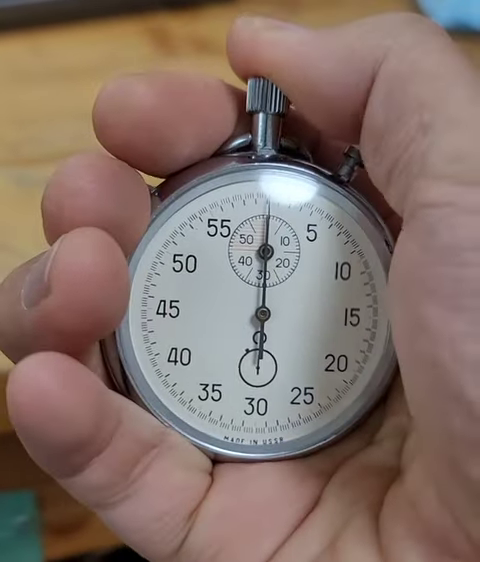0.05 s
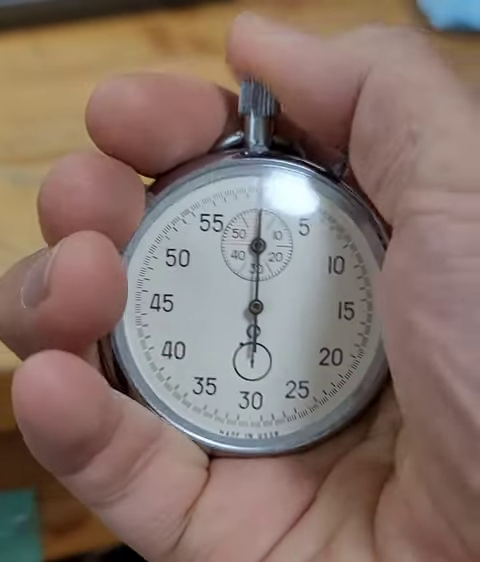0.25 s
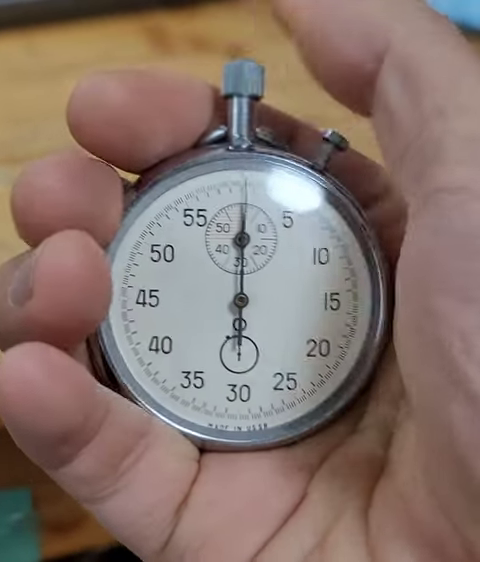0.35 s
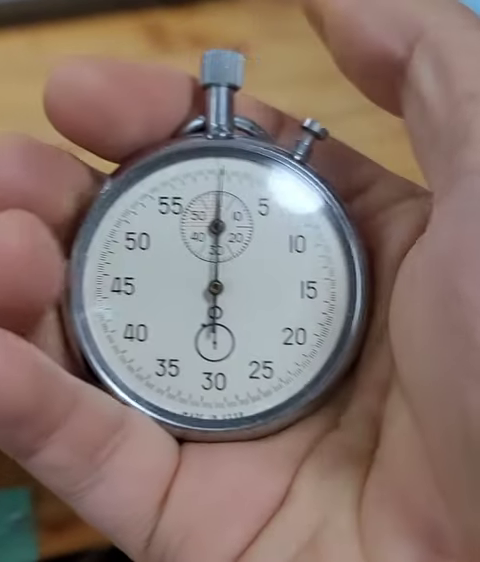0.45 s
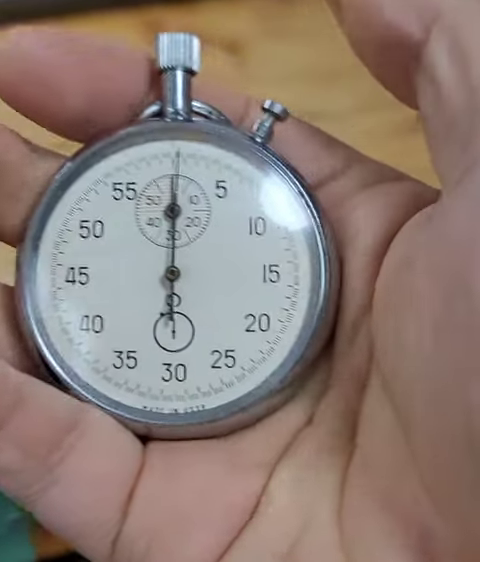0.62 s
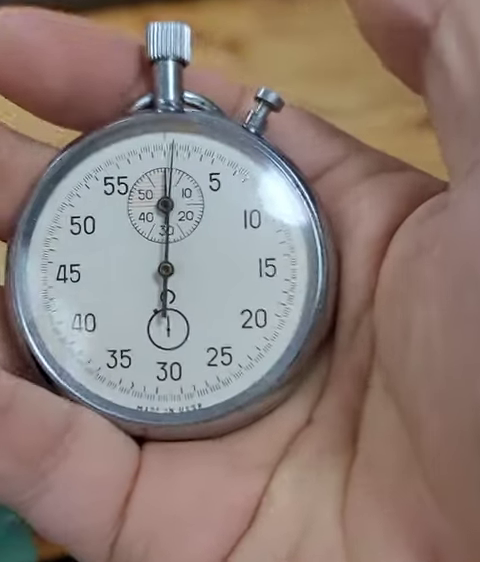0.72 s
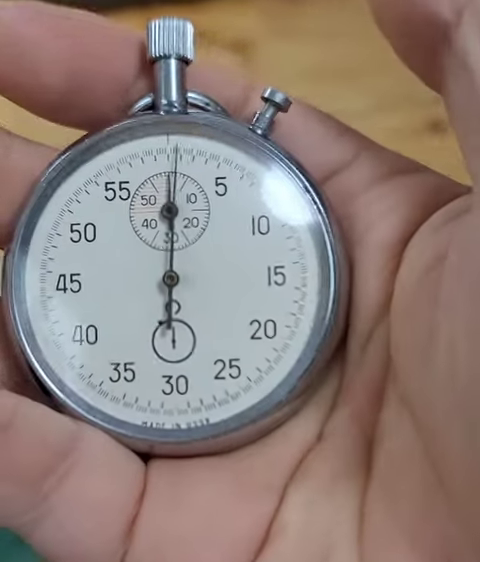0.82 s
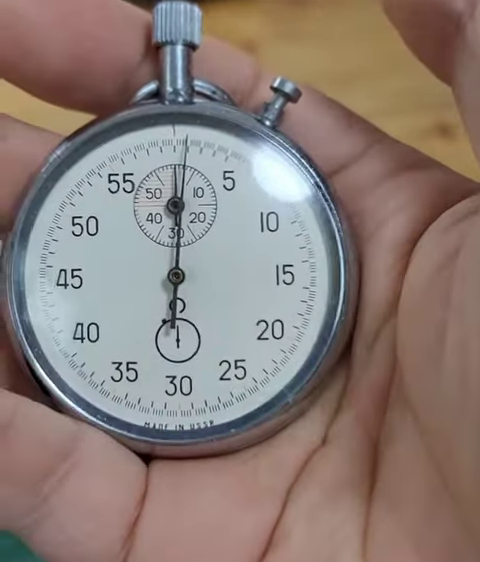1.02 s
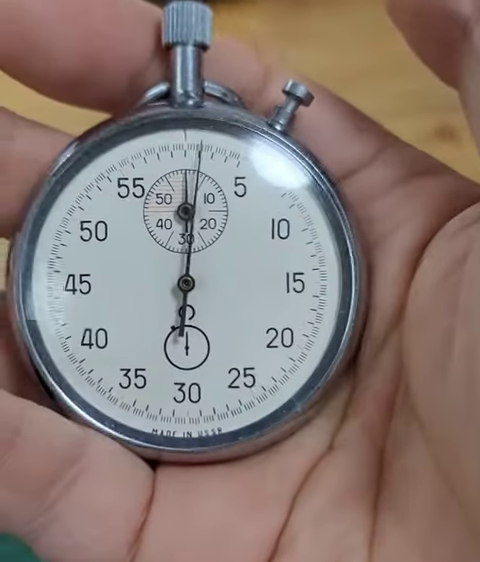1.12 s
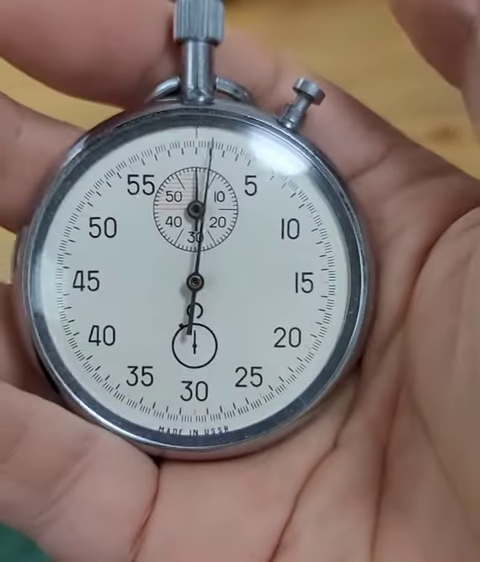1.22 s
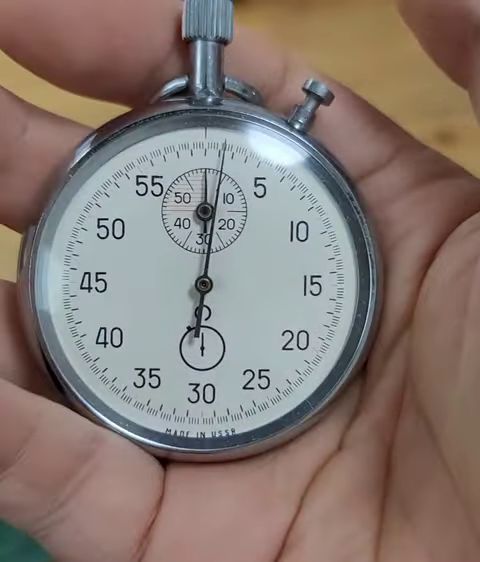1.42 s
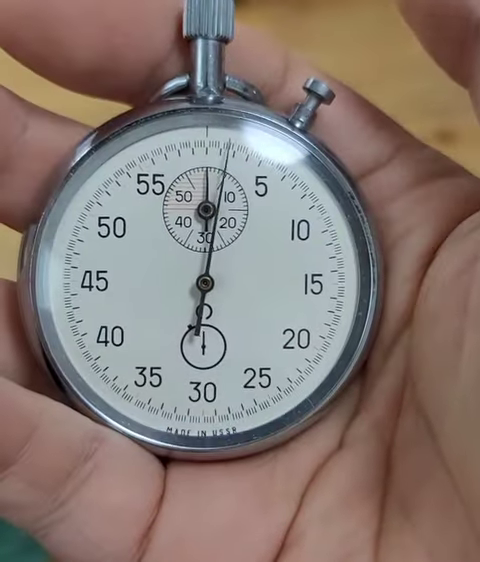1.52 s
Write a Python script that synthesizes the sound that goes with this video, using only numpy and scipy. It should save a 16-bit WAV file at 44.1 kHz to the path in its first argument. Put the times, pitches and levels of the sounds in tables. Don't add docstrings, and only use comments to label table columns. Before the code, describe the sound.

Two crisp metallic stopwatch clicks close together, then five soft alternating ticks in a quiet room.

```python
import sys
import numpy as np
from scipy import signal
from scipy.io import wavfile

SR = 44100
rng = np.random.default_rng(int(sys.argv[2]) if len(sys.argv) > 2 else 0)


def convert_level_to_amplitude(level_db):
    exponent = np.asarray(level_db, float) / 20
    return 10 ** exponent


def wav_record(signal):
    frames = np.transpose(np.atleast_2d(signal))
    bounded = np.clip(frames, -1, 1)
    quanta = np.round(bounded * 32767).astype(np.int16)
    wavfile.write(sys.argv[1], SR, quanta)


N = 68355


def rms_one(x):
    return x / np.sqrt(np.mean(x ** 2) + 1e-20)


def at_hz(points, hz, column=1):
    points = np.array(points)
    return np.interp(np.log(hz), np.log(points[:, 0]), points[:, column])


def bands():
    edges_hz = 23.5 * 2 ** np.arange(0, 10, .5)
    return [(np.sqrt(lo * hi), signal.butter(2, [lo, hi], "band", fs=SR, output="sos"))
            for lo, hi in zip(edges_hz, edges_hz[1:])]


# [f/Hz, level/dB]
HUSH_SPECTRUM = [(20, -14), (65, -5), (123, -15), (285, -15.5), (1000, -26), (3070, -31.5), (8000, -45.5),
                 (16000, -45)]
# [f/Hz, correlation]
HUSH_LIKENESS = [(60, 0.77), (240, 0.64), (950, -0.24), (3770, -0.14), (15000, 0.01)]
# [f/Hz, level/dB]
HUSH_PAN = [(60, -2), (240, -3.5), (950, -1.5), (3770, -3), (15000, -2)]


def hush():
    level_db = -68.5
    out, white = 0, rng.standard_normal((2, 2, N + SR))
    for k, (hz, sos) in enumerate(bands()):
        mid, side = signal.sosfilt(sos, white[k % 2])[:, SR:]
        alike = np.clip(at_hz(HUSH_LIKENESS, hz), -1, 1)
        pan_db = at_hz(HUSH_PAN, hz) / 2 * np.array([[1], [-1]])
        pair = np.sqrt(1 + alike) * mid + np.sqrt(1 - alike) * side * [[1], [-1]]
        out = out + convert_level_to_amplitude(at_hz(HUSH_SPECTRUM, hz) + pan_db) * pair
    return convert_level_to_amplitude(level_db) * rms_one(out)


# [f/Hz, width/Hz, level/dB]
DRONES = [(54.77, 4, -68.5), (66, 14, -73.5), (174, 13, -82), (278.5, 9.1, -82)]


def drones():
    out = 0
    for hz, width_hz, db in DRONES:
        r, hum = np.exp(-np.pi * width_hz / SR), rng.standard_normal(N + SR)
        poles = [1, -2 * r * np.cos(2 * np.pi * hz / SR), r * r]
        for _ in range(2):
            hum = signal.lfilter([1, 0, -1], poles, hum)
        out = out + convert_level_to_amplitude(db) * rms_one(hum[SR:])
    return out * convert_level_to_amplitude(np.array([[-2.2], [2.2]]))


def strike(contacts, modes, crack, scrape=0):
    longest_ring_s, ring_right_lag_s, crack_right_lag_s = .025, .0003, .0006
    scrape_ring_db = -16.5
    t, out, knocks = np.arange(N) / SR, np.zeros((2, N)), np.zeros(N)
    for s, db, _ in contacts:
        knocks[int(s * SR)] = convert_level_to_amplitude(db)
    knocks += convert_level_to_amplitude(scrape_ring_db) * scrape * rng.standard_normal(N)

    for k, (hz, left_db, right_db, t60_s) in enumerate(modes):
        r, w = convert_level_to_amplitude(-60 / (min(t60_s, longest_ring_s) * SR)), 2 * np.pi * hz / SR
        poles = [1, -2 * r * np.cos(w), r * r]
        sign = (-1) ** k
        ring = signal.lfilter([0, np.sin(w)], poles, knocks * sign + 1e-18)
        out[0] += convert_level_to_amplitude(left_db) * ring
        out[1] += convert_level_to_amplitude(right_db) * np.interp(t - ring_right_lag_s, t, ring)

    force = np.zeros(N) + scrape
    for s, db, decay_s in contacts:
        fall = np.clip((t - s) / max(decay_s, 1e-4), 0, 60)
        force += convert_level_to_amplitude(db) * np.exp(-fall) * (t >= s)
    force_pair = np.array([force, np.interp(t - crack_right_lag_s, t, force)])
    chatter = force_pair * rng.standard_normal((2, N)) + 1e-18
    for hz, sos in bands()[7:]:
        crack_db = np.array([[at_hz(crack, hz)], [at_hz(crack, hz, column=2)]])
        out += convert_level_to_amplitude(crack_db) * signal.sosfilt(sos, chatter)
    return out


# [t/s, level/dB, decay/s]
TOUCH = [
    (.0764, -45.5, .0008),
    (.085, -63.5, .001),
]
# [f/Hz, left level/dB, right level/dB, t60/s]
TOUCH_RING = [(1620, 2.5, 3, 0.023), (3100, -4.5, -5, .015), (4740, -2.5, -2, .005),
              (6500, -6.5, -6.5, .003), (11700, -9.5, -8, 0.0034)]
# [f/Hz, left level/dB, right level/dB]
SMALL_CRACK = [(1000, -22, -19.5), (3000, 0.5, -10), (8000, -5, -6.5), (12300, -6, -5), (16000, -2, -0.5)]


def thumb_touch():
    return strike(TOUCH, TOUCH_RING, SMALL_CRACK)


# [f/Hz, level/dB]
ROOM = [(500, -15), (1500, -11), (3000, -7.5), (6000, -9.5), (10000, -11.5), (15000, -9.5)]
# [f/Hz, t60/s]
ROOM_T60 = [(500, .2), (1500, .24), (3000, .29), (4700, .26), (10000, .27), (15000, .22)]


def room(x):
    gap_s = .0027
    t = np.arange(SR // 2) / SR
    white, echo = rng.standard_normal((2, 2, len(t))), 0
    for k, (hz, sos) in enumerate(bands()[6:]):
        decay_db = at_hz(ROOM, hz) - 60 * t / at_hz(ROOM_T60, hz)
        echo = echo + signal.sosfilt(sos, white[k % 2]) * convert_level_to_amplitude(decay_db)
    echo = echo * np.clip(t / gap_s, 0, 1) / np.sqrt(SR / 50)
    return signal.fftconvolve(x, echo, axes=1)[:, :N]


# [start t/s, end t/s, start level/dB, end level/dB]
CREEP = [
    (0.212, .235, -60.5, -37.5),
    (0.383, .4033, -59.5, -37),
]


def stem_creep(stroke):
    start_s, end_s, start_db, end_db = CREEP[stroke]
    t = np.arange(N) / SR
    level_db = np.interp(t, [start_s, end_s], [start_db, end_db])
    return convert_level_to_amplitude(level_db) * (t > start_s) * (t < end_s)


# [t/s, level/dB, decay/s]
SLACK = [
    (.2132, -41, .001),
    (.3898, -35, .0008),
]
# [f/Hz, left level/dB, right level/dB, t60/s]
SLACK_RING = [(1400, -7.5, -10, .01), (3000, -3, -6, .012), (5000, -6.5, -4.5, .006), (6300, -5, -8, .008),
              (10500, -5, -8, .003)]


def take_up_slack():
    return strike(SLACK, SLACK_RING, SMALL_CRACK)


# [t/s, level/dB, decay/s]
PRESS = [
    (.2349, -17, 0.0024),
    (.2362, -12, .0008),
    (.2368, -20, 0.0014),
    (.2398, -19.5, 0.0029),
    (.2415, -22.5, .002),
    (.2455, -25, 0.0026),
]
# [f/Hz, left level/dB, right level/dB, t60/s]
PRESS_RING = [(324.75, -24, -29.5, 0.0056), (920, -15, -19.5, 0.013), (1400, -12, -8, 0.0075),
              (2130, -8.5, -5, .012), (2600, -7.5, -7.5, .01), (3000, -6.5, -5.5, .013),
              (3294, -9, -8.5, .013), (3916, -15, -0.5, 0.0065), (4473, -4, -12, 0.0089),
              (5060, -13, -7.5, 0.019), (6556, -6, -3, .004), (9050, -8.5, -15.5, 0.0047),
              (11300, -12, 2, .003), (14800, -7.5, -16.5, 0.0028)]
# [f/Hz, left level/dB, right level/dB]
PRESS_CRACK = [(300, -23.5, -31.5), (1012.5, -2.5, -9), (3014, -1, -3), (7500, -12.5, -9.5), (12000, 0, -5),
               (16070, -1.5, -7)]


def crown_press():
    return strike(PRESS, PRESS_RING, PRESS_CRACK, stem_creep(0))


# [t/s, level/dB, decay/s]
RELEASE = [
    (.4033, -12.5, 0.0013),
    (.4041, -30.5, .0005),
    (.4095, -27, 0.0013),
]
# [f/Hz, left level/dB, right level/dB, t60/s]
RELEASE_RING = [(700, -50, -39, 0.003), (1210, -21.5, -31.5, 0.0066), (1996, -26, -18, .008),
                (2793, -12, -6, .012), (3105, 1.5, 0.5, 0.02), (3208, -6.5, -4, 0.012),
                (4570, -18, -14, 0.0035), (6900, -14, -13.5, .004), (9790, -24.5, -11, 0.001),
                (13200, -5.5, -27.5, 0.0025)]
# [f/Hz, left level/dB, right level/dB]
RELEASE_CRACK = [(600, -38.5, -48.5), (2000, -16.5, -29), (5000, -13.5, 3), (7700, -1.5, -8),
                 (12300, -0.5, -17), (16000, -16.5, -8.5)]


def crown_release():
    return strike(RELEASE, RELEASE_RING, RELEASE_CRACK, stem_creep(1))


# [t/s, level/dB, decay/s]
STOP = [
    (.4064, -21.5, 0.0014),
]
# [f/Hz, left level/dB, right level/dB, t60/s]
STOP_RING = [(3090, -4.5, -6.5, .012), (4800, -1, 0.5, 0.012), (6060, -6.5, 2.5, .004),
             (10220, -3, 4.5, 0.001), (14580, -9.5, -0.5, .003)]


def lever_stop():
    return strike(STOP, STOP_RING, RELEASE_CRACK)


# [t from drop/s, level/dB]
BEAT = [
    (-.009, -9),
    (-.004, -16),
    (0, 0),
    (.0085, -12),
]
BEATS_DB = [
    -58,
    -67.5,
    -61,
    -66,
    -60.5,
]
# [f/Hz, left level/dB, right level/dB, t60/s]
TICK_RING = [(3355, -12, -10, 0.022), (4181, -10, -9, 0.016), (6230, -8, 1, 0.0059),
             (6820, -17, -10, 0.0072), (8600, 9, 4, .009), (10130, -26, -21, 0.002806)]
TOCK_RING = [(3180, -2, -5, 0.0099), (4210, -1, 0.5, 0.017), (6360, -0.5, 8.5, 0.0073),
             (8500, 3.5, -15, 0.0088)]
# [f/Hz, left level/dB, right level/dB]
TICK_CRACK = [(1510, -12, -23), (3000, 2, 4), (7840, 15.5, 8), (11900, 7, 5), (16000, 10, 5)]


def escapement():
    first_tick_s, beat_s = .6256, .2002
    spread_db, chatter_s = 1.5, .0007
    ticks, tocks = [], []
    for k, beat_db in enumerate(BEATS_DB):
        side = tocks if k % 2 else ticks
        for s, db in BEAT:
            level_db = db + beat_db + spread_db * rng.standard_normal()
            side.append((first_tick_s + k * beat_s + s, level_db, chatter_s))
    return strike(ticks, TICK_RING, TICK_CRACK) + strike(tocks, TOCK_RING, TICK_CRACK)


def scene():
    watch = thumb_touch() + take_up_slack() + crown_press()
    watch = watch + crown_release() + lever_stop() + escapement()
    low_cut = signal.butter(2, 83, "high", fs=SR, output="sos")
    watch = signal.sosfilt(low_cut, watch)
    return hush() + drones() + watch + room(watch)


def roll_off(x):
    return signal.sosfilt(signal.butter(12, 16810, fs=SR, output="sos"), x)


def record(dry):
    top_cut = signal.cheby2(12, 70, 16900, fs=SR, output="sos")
    mix = signal.sosfilt(top_cut, dry)
    return roll_off(mix)


dry = scene()
out = record(dry)
wav_record(out)
```